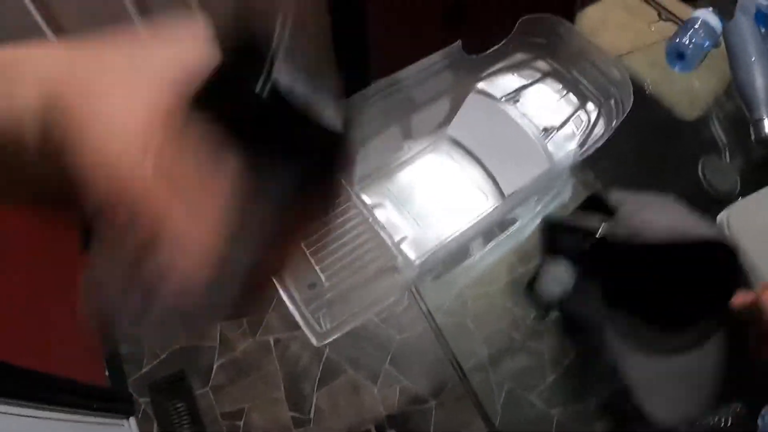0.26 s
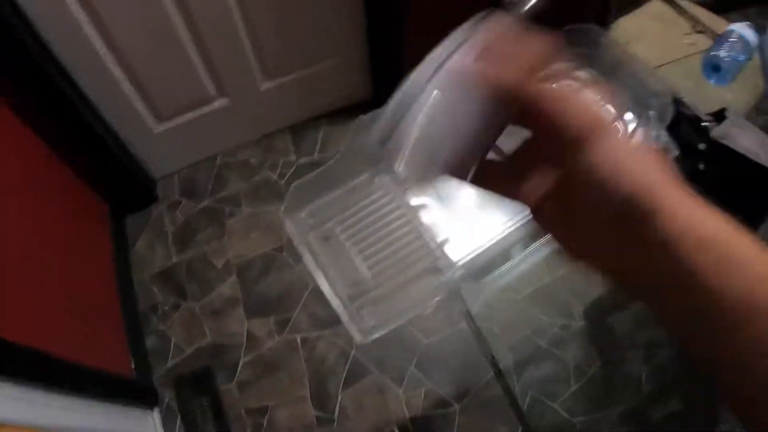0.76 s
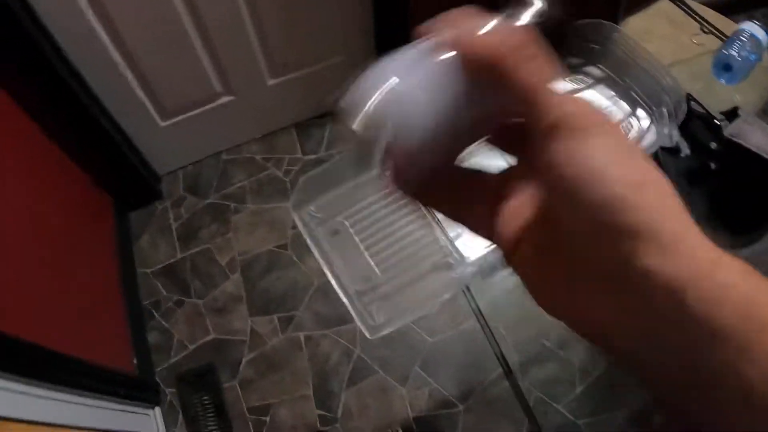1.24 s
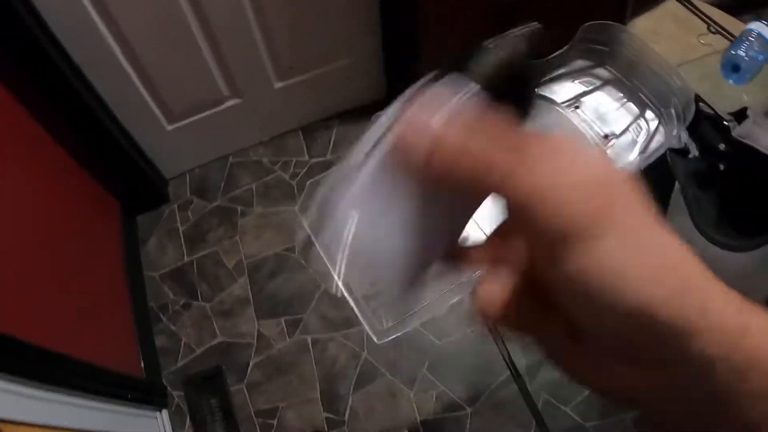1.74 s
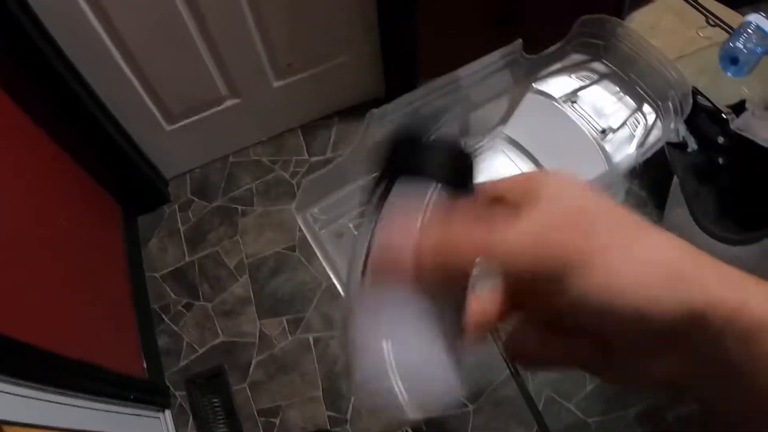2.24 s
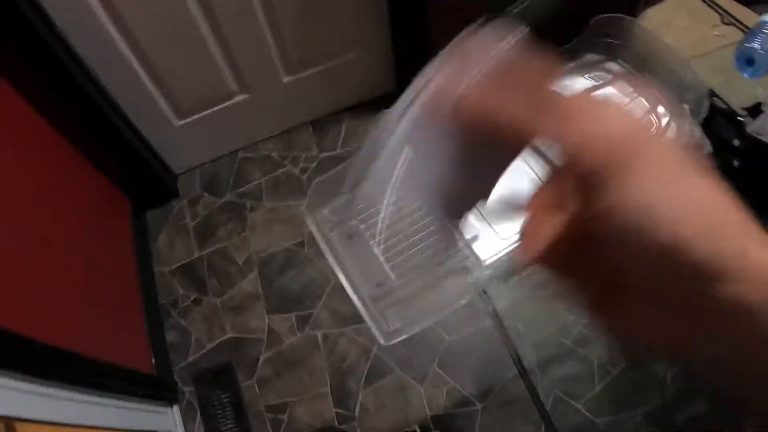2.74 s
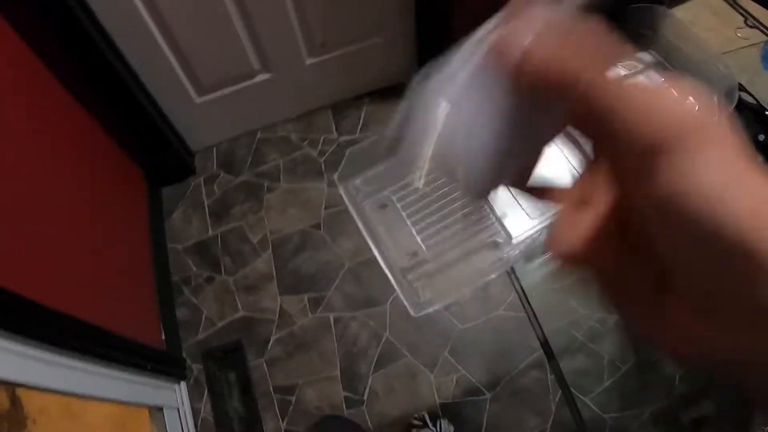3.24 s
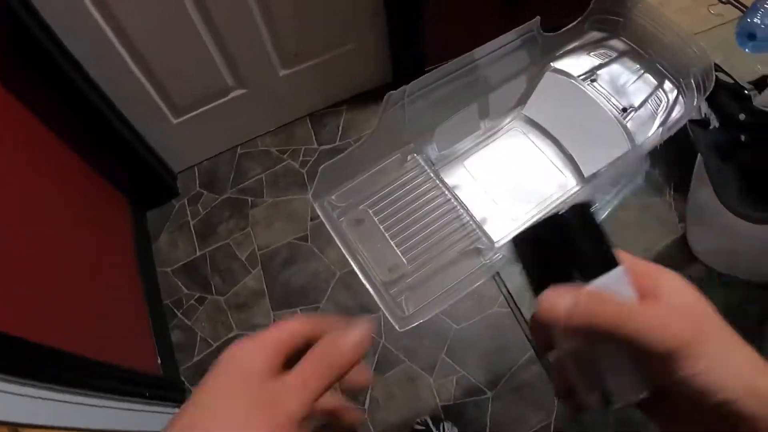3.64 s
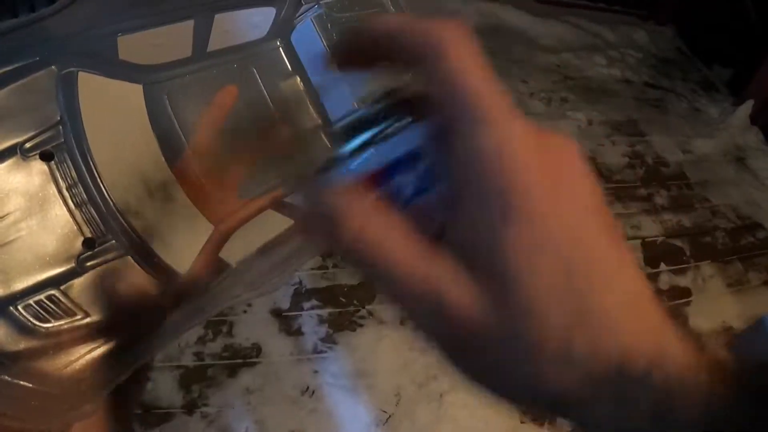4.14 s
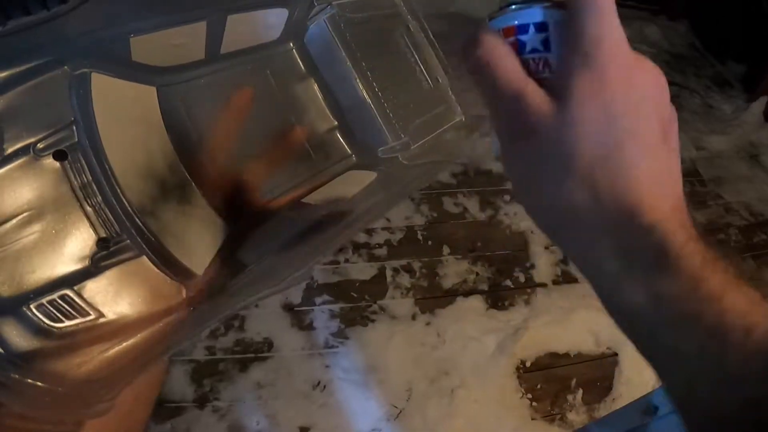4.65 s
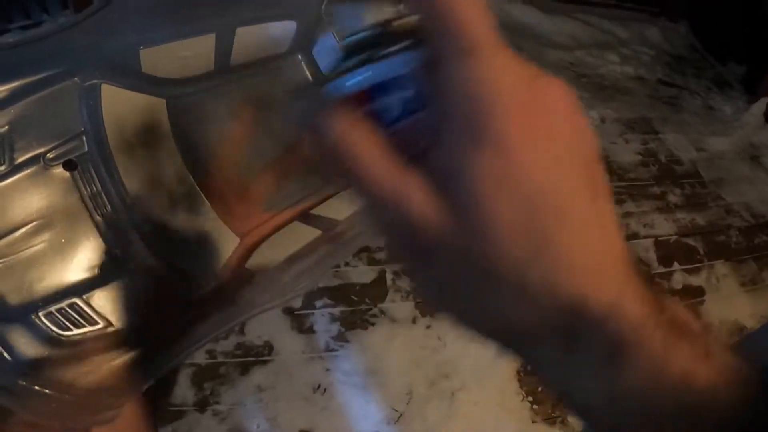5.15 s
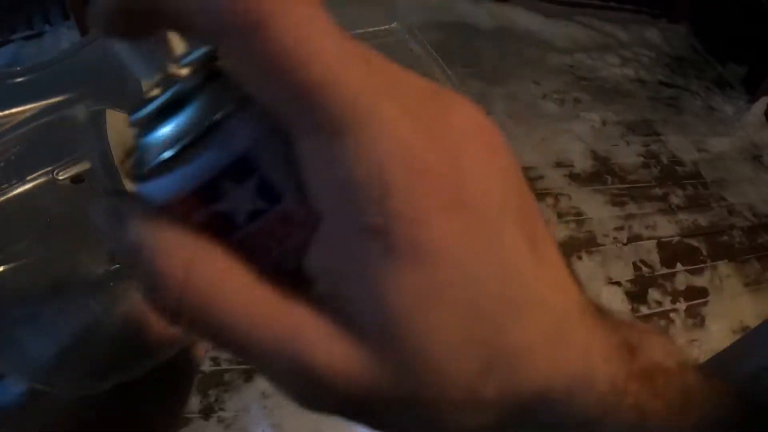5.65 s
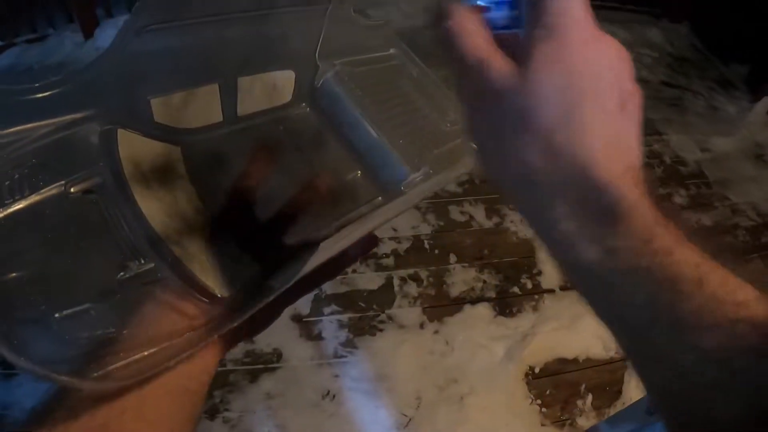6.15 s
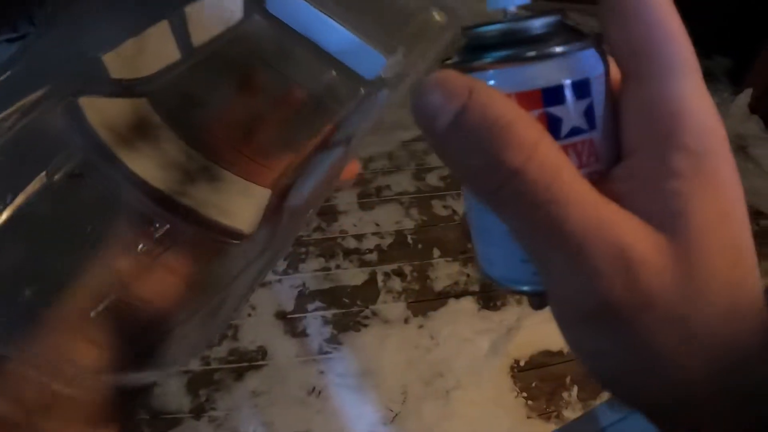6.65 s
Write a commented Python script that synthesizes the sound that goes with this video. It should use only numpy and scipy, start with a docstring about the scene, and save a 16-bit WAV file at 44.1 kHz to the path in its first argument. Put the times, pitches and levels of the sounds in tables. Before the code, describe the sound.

A spray can is shaken fast indoors, its ball clacking sharply, then a plastic cap snaps and short gritty hisses puff in a quiet yard.

```python
"""A ball rattles in a spray can shaken fast in a small hard room: damped modes of the tin clack, contact rings
tick. Outdoors, short nozzle presses then give a gritty jet hiss: broad noise and whistling bands gated by a
valve. Plastic clicks are damped rings, handling knocks and a wind thump are pulses and low rings, and finger
rubs are filtered noise. Room tone and a fan's wavering sine hum lie behind the shaking; yard noise and low wind
rumble lie behind the spray."""
import sys
import numpy as np
from scipy import signal
from scipy.fft import rfft, irfft, next_fast_len
from scipy.io import wavfile
from scipy.ndimage import uniform_filter1d

SR = 44100
rng = np.random.default_rng(int(sys.argv[2]) if len(sys.argv) > 2 else 0)


def to_wav(s):
    """Save 16-bit WAV."""
    ch = np.atleast_2d(s).T  # columns
    pcm = np.round(np.clip(ch, -1, 1) * 32767)  # PCM
    wavfile.write(sys.argv[1], SR, pcm.astype(np.int16))


N = 304290
T = np.arange(N) / SR
SIDE = np.array([[1], [-1]])  # opposite signs in left and right
OUTSIDE_S = 3.82  # the outdoor background starts to fade in


def undb(db):
    """Amplitude ratio: 20 dB is a factor of ten."""
    return 10 ** (np.asarray(db) / 20)


def level(x, db):
    """Root-mean-square scaling: sets the rms level in dB."""
    return x * undb(db) / np.sqrt(np.mean(x ** 2))


def decay(t, t60):
    """Exponential damping: the amplitude falls 60 dB in t60 seconds."""
    return np.exp(-np.log(1000) * t / t60)


def colour(points, width):
    """Spectral shaping: two-channel noise follows (Hz, dB) points; width is the side share."""
    hz, db = np.transpose(points)
    size = next_fast_len(N)
    bins_hz = np.arange(size // 2 + 1) * SR / size
    gain = undb(np.interp(np.log(bins_hz + 1), np.log(hz), db))
    mid, side = irfft(rfft(rng.standard_normal((2, size))) * gain, size)[:, :N]
    return level(mid + width * side * SIDE, 0)


def band(hz, width, side):
    """Resonance: noise passes twice through one peak filter; side is the side share."""
    b, a = signal.iirpeak(hz, hz / width, SR)
    once = signal.lfilter(b, a, rng.standard_normal((2, N)))
    mid, other = signal.lfilter(b, a, once)
    return level(mid + side * other * SIDE, 0)


def walk(rate):
    """Random modulation: levels held 1 / rate seconds and smoothed twice, with spread near 1."""
    k = int(SR / rate)
    steps = np.repeat(rng.standard_normal(N // k + 1), k)
    return 1.14 * uniform_filter1d(uniform_filter1d(steps, k), k)[:N]


def rings(modes, count, scatter_db, detune, pitch=1):
    """Modal synthesis: each blow, peak 1, excites the modes with new weights, pitches and phases."""
    hz, db, t60 = np.transpose(modes)[:, None, :, None]
    chance = rng.standard_normal((count, 3, len(modes), 1))
    t = np.arange(600) / SR
    mode_hz = hz * pitch * (1 + detune * chance[:, 0])
    wave = np.sin(2 * np.pi * mode_hz * t + 1.94 * chance[:, 1])
    ring = np.sum(undb(db + scatter_db * chance[:, 2]) * wave * decay(t, t60), axis=1)
    ring = ring * (1 - np.exp(-t / .00008))  # soft onset
    return ring / np.abs(ring).max(axis=1, keepdims=True)


def place(times, waves):
    """Superposition: each wave is added at its time."""
    out = np.zeros(N + waves.shape[1])
    starts = (np.asarray(times) * SR).astype(int)
    np.add.at(out, starts[:, None] + np.arange(waves.shape[1]), waves)
    return out[:N]


def space(x, wet_db, t60, dull_hz, width):
    """Reverberation: direct sound plus a diffuse decaying tail; width is the tail's side share."""
    t = np.arange(int(.25 * SR)) / SR
    mid, side = rng.standard_normal((2, len(t))) * decay(t, t60) * (t > .0008)
    low_pass = signal.butter(1, dull_hz, fs=SR, output="sos")
    tail = signal.sosfilt(low_pass, mid + width * side * SIDE)
    tail = level(tail, wet_db) / np.sqrt(len(t))
    return x + signal.fftconvolve(x[None], tail, axes=1)[:, :N]


# The ball lands on the base. Each row: first touch in seconds, nominal tin peak in dB.
CLACKS = [(0.042, -16), (0.0929, -18), (0.1438, -14), (0.194, -11.5), (0.242, -14), (0.296, -17),
          (0.333, -18.5), (0.6746, -13.5), (0.7224, -17.5), (0.776, -14), (0.8298, -15), (0.8813, -15.5),
          (0.9317, -13.5), (0.9866, -11.5), (1.0975, -11), (1.148, -11), (1.2013, -10.5), (1.254, -10.5),
          (1.3077, -12.5), (1.3634, -10), (1.4158, -11), (1.469, -11.5), (1.52, -13), (1.5719, -10),
          (1.6303, -16), (1.681, -10), (1.736, -10), (1.7925, -8.5), (1.85, -11.5), (1.9023, -9.5),
          (1.958, -14.5), (2.0136, -12.5), (2.066, -13.5), (2.1222, -19.5), (2.173, -11), (2.2264, -10),
          (2.2836, -9.5), (2.3331, -12.5), (2.3922, -11.5), (2.4432, -14), (2.5014, -11), (2.5566, -10.5),
          (2.615, -13.5), (2.671, -10), (2.7295, -13), (2.7866, -12), (2.843, -13), (2.8964, -13),
          (2.9545, -13.5), (3.0136, -12.5), (3.072, -12), (3.125, -11.5), (3.1814, -10.5), (3.238, -13.5),
          (3.2928, -16.5), (3.3484, -12), (3.4067, -15), (3.468, -14.5), (3.514, -16.5), (3.574, -26.5)]
# The ball flies back against the dome. Each row: first touch in seconds, nominal bright peak in dB.
TICKS = [(0.015, -14), (0.1128, -11), (0.1618, -12), (0.2566, -11), (0.3073, -16), (0.3583, -11.5),
         (0.396, -17), (0.5405, -17.5), (0.597, -22), (0.621, -10.5), (0.652, -10.5), (0.699, -8.5),
         (0.7533, -8), (0.808, -8.5), (0.8537, -10), (0.9055, -10.5), (0.9582, -8.5), (1.0143, -13),
         (1.067, -10), (1.1235, -13), (1.173, -11.5), (1.232, -9.5), (1.285, -12), (1.336, -11),
         (1.3894, -11), (1.497, -13.5), (1.5505, -14), (1.601, -14.5), (1.879, -16), (2.042, -14.5),
         (2.0947, -14.5), (2.59, -11), (2.7643, -14.5), (3.098, -15), (3.269, -12), (3.3854, -14.5)]
# Modes of the tin wall. Each row: mean frequency in Hz, mean relative level in dB, t60 in seconds.
TIN = [(2195, -11, 0.005), (3200, -5, 0.009), (3750, -3, 0.005), (4417, 0, 0.0026), (5870, 6.5, 0.0014),
       (6910, -2.5, 0.0058)]
# Contact ring of the ball. Each row: mean frequency in Hz, mean relative level in dB, t60 in seconds.
TICK = [(9280, 3.5, 0.0023), (12070, 17.5, 0.0007), (13640, 7, 0.004)]
# Vigour of shaking. Each row: time in seconds, relative level in dB, left minus right in dB.
SHAKE = [(0, -37.5, 0), (.4, -42.5, 1), (.5, -46.5, -5.5), (0.552, -38.5, 0), (3.001, -45.5, -2.5),
         (3.54, -43.5, -2.5), (3.649, -61.5, -7.5)]
# The new grip loosens. Each row: time in seconds, pitch ratio of the base, share of upper modes held down.
GRIP = [(0.9, 0.94, 0.93), (1.3, 1, 0.28)]
REGRIP_S = .5
CONTACT_S = 0.00074  # from first touch to the full blow
TICK_IN_CLACK_DB, TIN_IN_TICK_DB = -3.5, -9
TOUCH_HELD_DB = -11  # muffling of light touches in a full grip
SLOW_BOUNCE = 2.2  # rebound delays are this much longer in the slow first strokes
TOUCHES = 520


def strikes(hush_db):
    """Impact excitation: strikes rebound twice and light touches fill the strokes, all ringing tin and ball."""
    clack, tick = np.array(CLACKS), np.array(TICKS)
    first_touch = np.r_[clack[:, 0], tick[:, 0]]
    order = np.argsort(first_touch)
    s = first_touch[order, None] + CONTACT_S
    on_base = (order < len(clack))[:, None]
    tin_db = np.r_[clack[:, 1], tick[:, 1] + TIN_IN_TICK_DB][order, None]
    tick_db = np.r_[clack[:, 1] + TICK_IN_CLACK_DB, tick[:, 1]][order, None]
    grip_s, pitch, held_share = np.transpose(GRIP)

    when, effort_db, _ = np.transpose(SHAKE)
    touch = rng.random((TOUCHES, 3))
    at = touch[:, :1] * when[-2]
    # the ball flies free, and so is quiet, just before it strikes
    to_next = np.append(s, 99)[np.searchsorted(s[:, 0], at)] - at
    approach_db = 20 * np.log10(np.clip(to_next / 0.014, .15, 1))
    touch_db = np.interp(at, when, effort_db) + 22.0 + 11 * touch[:, 1:2] ** 2
    touch_db = touch_db + 2 * np.interp(at, T, hush_db) + approach_db
    muffle_db = TOUCH_HELD_DB * np.interp(at, grip_s, held_share)  # a tight grip muffles light touches
    touch_tin_db = touch_db - 9 * touch[:, 2:] + muffle_db
    touch_tick_db = touch_db - 9 * (1 - touch[:, 2:]) + muffle_db / 2

    rebound = rng.random((len(s), 4))
    bounce = np.where(s < REGRIP_S, SLOW_BOUNCE, 1)
    first = s + bounce * (0.0014 + 0.0016 * rebound[:, :1])
    second = s + bounce * (0.0026 + 0.0065 * rebound[:, 1:2])
    small_loss_db, large_loss_db = -1.5 - 4 * rebound[:, 2:3], -6 - 10 * rebound[:, 3:]
    dome_held = ~on_base * (s > REGRIP_S) * np.interp(s, grip_s, held_share)
    tin_db = tin_db + TOUCH_HELD_DB / 2 * dome_held

    s = np.vstack([s, first, second, at])
    tin_db = np.vstack([tin_db, tin_db + small_loss_db, tin_db + large_loss_db, touch_tin_db])
    tick_db = np.vstack([tick_db, tick_db + large_loss_db, tick_db + small_loss_db, touch_tick_db])
    # the first, full-handed grip chokes the main wall modes
    choked = rings(TIN[:1] + TIN[3:], len(s), 3., .1)
    tin = np.where(s < REGRIP_S, choked, rings(TIN, len(s), 2.2, .07))
    # the thick base favours the lower modes, more so in a tight grip
    on_base = np.vstack([on_base, on_base, on_base, np.zeros_like(at, bool)]) & (s > REGRIP_S)
    held = on_base * np.clip(np.interp(s, grip_s, held_share), 0, 1)
    base = rings(TIN[:3], len(s), 1.23, 0.051, np.interp(s, grip_s, pitch)[:, :, None])
    tin = held * base + (1 - held) * tin
    bright = undb(tick_db) * rings(TICK, len(s), 0.56, 0.092)

    blows = place(s[:, 0], undb(tin_db) * tin + bright)
    high_pass = signal.butter(2, 1100., "high", fs=SR, output="sos")
    out = space(signal.sosfilt(high_pass, blows), -17.0, 0.086, 20000.0, 0.94)
    # each bright tick beams to one side or the other
    beam = 0.31 * rng.standard_normal((len(s), 1))
    return out + place(s[:, 0], beam * bright) * SIDE


def slosh(hush_db):
    """Turbulent flow: the paint is shaped noise that follows the shaking and hushes in flight."""
    when, effort_db, _ = np.transpose(SHAKE)
    noise = colour([(100, 1), (250, -6.5), (1200, -4.5), (3500, 1.0), (9000, 0.0), (16000, -4.0)], 0.076)
    slosh_db = np.interp(T, when, effort_db, right=-99) - 4.4 * (T < REGRIP_S)
    return noise * undb(slosh_db + hush_db + 3.83 * walk(60))


# ball and paint airborne: seconds before a clack (latest, earliest), and dB in slow and fast strokes
FLIGHT_S, FAST_FLIGHT_S, FLIGHT_DB = (0.011, 0.021), (0.00073, 0.016), (-7, -1)


def ball():
    """Free flight and impact: contact sounds drop before each clack, and the whole can swings sideways."""
    clack_s = np.array(CLACKS)[:, 0]
    to_clack = np.append(clack_s, 99)[np.searchsorted(clack_s, T)] - T
    slow = T < REGRIP_S
    lands = np.where(slow, FLIGHT_S[0], FAST_FLIGHT_S[0])
    lifts = np.where(slow, FLIGHT_S[1], FAST_FLIGHT_S[1])
    flight = (to_clack > lands) & (to_clack < lifts)
    hush_db = uniform_filter1d(np.where(slow, *FLIGHT_DB) * flight, size=130)
    when, _, pan_db = np.transpose(SHAKE)
    pan = np.interp(T, when, pan_db) / 2
    return (strikes(hush_db) + slosh(hush_db)) * undb([pan, -pan])


# Nozzle presses. Each row: fully open in seconds, shuts in seconds, relative full hiss in dB,
# sag in dB once the finger eases.
PRESSES = [(3.811, 3.875, -35, -1), (4.117, 4.259, -26, -3.5), (4.476, 4.623, -24.5, -8.5),
           (4.824, 4.972, -26, -3.5), (5.181, 5.328, -24, -10.5), (5.527, 5.675, -25.5, -4.5),
           (5.899, 6.039, -24, -10), (6.267, 6.405, -26.5, -5)]
# Broad jet spectrum. Each row: frequency in Hz, relative density in dB per Hz.
JET = [(100, -19.5), (200, -9), (864, -12.5), (2130, -8), (5000, -3), (8700, -17), (12300, -14.5),
       (15000, -39.5)]
# Whistling bands of the jet. Each row: centre in Hz, nominal rms level against the broad hiss in dB.
JET_BANDS = [(4020, -6.5), (5500, -7), (6500, -5), (8210, -8)]
JET_BAND_Q, JET_BAND_STEEP, JET_FLICKER_DB = 5.2, 1.05, 3
LEAK_S, LEAK_DB, SNAP_S, SNAP_DB = 0.031, -32.5, 0.0095, -11  # before fully open
HOLD_SHARE, SWELL_DB, EASE_S = 0.44, 1.5, 0.068  # slight swell over the hold, then the finger eases
REVIVE_S, REVIVE_DB, DIE_S, DIE_DB = 0.029, 2.5, 0.024, -31.5  # before and after the valve shuts


def spray():
    """Jet turbulence: valve flow leaks, opens, swells, sags, revives and shuts; droplets make it sputter."""
    flow_db = np.full(N, -99.)
    for full, shuts, full_db, sag_db in PRESSES:
        eases = full + HOLD_SHARE * (shuts - full)
        sagged = min(eases + EASE_S, shuts - 1.5 * REVIVE_S)
        s = [full - LEAK_S, full - SNAP_S, full, eases, sagged, shuts - REVIVE_S, shuts, shuts + DIE_S]
        opening_db = [LEAK_DB, SNAP_DB, 0, SWELL_DB]
        closing_db = [sag_db - REVIVE_DB, sag_db + REVIVE_DB, sag_db - 2 * REVIVE_DB, sag_db + DIE_DB]
        db = full_db + np.array(opening_db + closing_db)
        flow_db = np.maximum(flow_db, np.interp(T, s, db, left=-99, right=-99))
    sputter_db = 1.0 * walk(900) + 2.0 * walk(150)
    flow = uniform_filter1d(undb(flow_db), size=60)
    # the bands come and go on their own and fade faster than the hiss when the flow drops
    bands = 0
    for hz, db in JET_BANDS:
        bands = bands + band(hz, hz / JET_BAND_Q, 0.18) * undb(db + JET_FLICKER_DB * walk(45))
    jet = colour(JET, 0.26) + bands * (flow / flow.max()) ** (JET_BAND_STEEP - 1)
    return undb(sputter_db - 3.5) * jet * flow


# Nozzle, cap and finger clicks. Each row: time in seconds, dry peak in dB, nominal centre in Hz.
CLICKS = [(3.7533, -20, 6920), (3.804, -6, 3420), (3.933, -9, 3820), (3.97, -23, 2420),
          (3.986, -26.5, 2850), (4.243, -15.5, 4500), (4.269, -23, 2350), (4.2877, -26.5, 2380),
          (4.301, -13.5, 3900), (4.332, -19.5, 4080), (4.3464, -24.5, 4400), (4.4213, -21.5, 5170),
          (4.453, -21, 7200), (4.7912, -23, 5040), (5.3737, -33.5, 4040), (5.875, -28, 5170),
          (6.207, -34, 3800), (6.566, -22.5, 3900), (6.6444, -19, 1820), (6.7093, -35.5, 4700),
          (6.859, -15.5, 4950), (6.878, -23.5, 4700), (6.898, -19, 4740)]


def clicks():
    """Damped resonance: each plastic click rings at its centre with weaker neighbours and a sharp edge."""
    waves = []
    for _, db, hz in CLICKS:
        modes = [(hz, 0, .006), (0.614 * hz, -10, .005), (1.51 * hz, -4, .004), (10000, -9, .002)]
        waves.append(undb(db) * rings(modes, 1, 3., 0.05)[0])
    starts = np.array(CLICKS)[:, 0] - .0004
    return space(place(starts, np.array(waves)), -8.5, 0.032, 9800.0, 0.92)


# The can jolts in the shaking hand. Each row: time in seconds, nominal peak in dB.
JOLTS = [(.212, -22), (0.312, -16.5), (1.712, -24.5), (1.827, -27), (1.936, -30.5), (2.481, -30),
         (2.824, -28.5), (2.936, -31.5), (3.322, -24)]
# Handling knocks, and one low wind thump at 40 Hz. Each row: time in seconds, nominal peak in dB, centre in Hz,
# t60 in seconds.
KNOCKS = [(0.4035, -26, 1300, .01), (.409, -29, 640, .018), (3.803, -25, 600, .012),
          (6.642, -21, 620, .012), (6.793, -25, 40, .11), (3.709, -31, 140, .05), (3.899, -31.5, 260, .09),
          (3.913, -26, 190, .06), (3.933, -31, 170, .14), (6.438, -35, 700, .014), (6.469, -31, 420, .02),
          (6.645, -34, 226, .16)]


def knocks():
    """Impulse and damped oscillation: jolts are one blunt push, knocks ring low with a short scuff."""
    t = np.arange(9000) / SR
    s, db = np.transpose(JOLTS)[:, :, None]
    push = t / .0005 * np.exp(1 - t / .0005) - .25 * t / .002 * np.exp(1 - t / .002)
    jolts = place(s[:, 0], undb(db) * push)
    s, db, hz, t60 = np.transpose(KNOCKS)[:, :, None]
    grit = uniform_filter1d(rng.standard_normal((len(s), len(t))), size=4)
    snap = grit * np.exp(-t / .003) * hz / 1100  # higher knocks snap more
    thump = -np.sin(2 * np.pi * hz * t) * decay(t, t60) + snap
    return jolts + space(place(s[:, 0], undb(db) * thump), -9, 0.16, 1900.0, 0.12)


# Fingers rubbing between presses. Each row: start in seconds, stop in seconds, relative level at the start
# in dB, relative level at the stop in dB, pitch in octaves above 1 kHz.
RUBS = [(3.7, 3.822, -49.5, -47.5, .3), (3.864, 4.083, -42.5, -57, 0.42), (4.256, 4.372, -60, -49.5, 1.56),
        (4.96, 5.123, -55, -59.5, 1.97), (5.32, 5.396, -54, -55, 1.7), (5.68, 5.793, -56, -53, 1.7),
        (6.032, 6.118, -60, -50, 1.95), (6.4, 6.52, -43.5, -51.5, 1.95), (6.532, 6.684, -49.5, -58, 3.3),
        (6.694, 6.78, -56.5, -53, 1.73), (6.789, 6.9, -45.5, -50, 2.8)]
# Hollow rings of the thin plastic shell held in the other hand. Each row: centre in Hz, filter width in Hz,
# nominal level against the broad rub in dB.
SHELL = [(900, 260, 6), (2100, 420, 5), (2800, 300, -7), (4470, 600, -2)]
SHELL_REACH = .8  # octaves
RUB_EDGE_S, RUB_REST_DB = 0.024, -71.5


def rustle():
    """Friction noise: grainy rubs wake the shell rings near their pitch; the hand never rests quite still."""
    rub_db, pitch = np.where(T > RUBS[0][0], RUB_REST_DB, -99.), np.zeros(N)
    for starts, stops, start_db, stop_db, octaves in RUBS:
        s = [starts - RUB_EDGE_S, starts, stops, stops + RUB_EDGE_S]
        db = np.interp(T, s, [RUB_REST_DB, start_db, stop_db, RUB_REST_DB], left=-99, right=-99)
        pitch = np.where(db > rub_db, octaves, pitch)
        rub_db = np.maximum(rub_db, db)
    rub = colour([(300, -3), (1200, -4.5), (6000, -7.5), (13000, -27.5)], 0.34) * undb(3.1 * walk(35))
    dull = signal.sosfilt(signal.butter(2, 1800, fs=SR, output="sos"), rub)
    rub = np.where(pitch < 1, dull, rub)  # low rubs are dull
    for hz, width, db in SHELL:
        near = (T > OUTSIDE_S) * np.exp(-((np.log2(hz / 1000) - pitch) / SHELL_REACH) ** 2)
        rub = rub + band(hz, width, .35) * near * undb(db + 3.5 * walk(50))
    return rub * undb(rub_db - 4.5 + 3.0 * walk(300))


# Room tone spectrum. Each row: frequency in Hz, relative density in dB per Hz.
ROOM = [(20, -26.5), (80, -2.5), (200, -19), (1400, -26.5), (2500, -42.5), (16000, -39.5)]
# Yard spectrum. Each row: frequency in Hz, relative density in dB per Hz.
YARD = [(100, -28), (179, -16), (400, -26), (510, -41.5), (1950, -45.5), (14000, -68)]
# Wind rumble outdoors. Each row: time in seconds, rms level in dB.
WIND = [(3.9, -58.5), (6.25, -43), (6.9, -46)]
ROOM_DB, YARD_DB = -52, -57
HUM_HZ, HUM_DB = 138.2, -51  # mean pitch and level of the fan


def air():
    """Ambient noise and tonal hum: room tone and fan give way to the quiet yard and wind rumble."""
    outside = np.clip((T - OUTSIDE_S) / 0.024, 0, 1)
    hum_phase = 2 * np.pi * np.cumsum(HUM_HZ * (1 + 0.0068 * walk(5.9))) / SR
    hum = undb(HUM_DB + 1.5 * walk(15)) * np.sqrt(2) * np.sin(hum_phase)
    room = colour(ROOM, 0.13) * undb(ROOM_DB + 2.0 * walk(4.03)) + hum
    yard = colour(YARD, 0.26) * undb(YARD_DB)
    wind = colour([(15, -7.5), (38, 4.5), (70, -24.5), (400, -60.0)], 0.15)
    wind = wind * undb(np.interp(T, *np.transpose(WIND)))
    return (1 - outside) * room + outside * (yard + wind)


def scene():
    """Superposition: the can, the handling and the surroundings add linearly."""
    return ball() + spray() + clicks() + knocks() + rustle() + air()


TOP_HZ = 16500


def record(dry):
    """Saturation and band-limiting: tanh rounds the sharpest peaks, then a steep low-pass cuts the top."""
    rounded = np.tanh(1.2 * dry) / 1.2
    return signal.sosfilt(signal.ellip(8, .2, 80, TOP_HZ, fs=SR, output="sos"), rounded)


dry = scene()
out = record(dry)
to_wav(out)
```